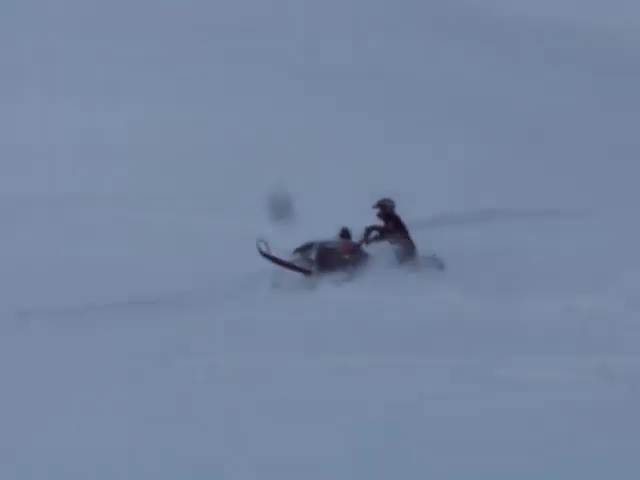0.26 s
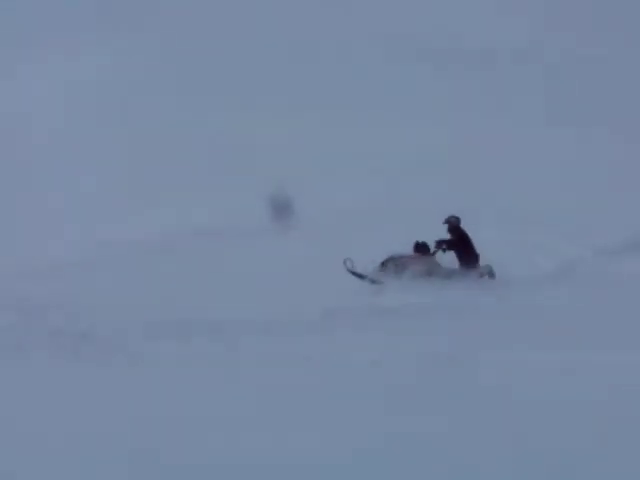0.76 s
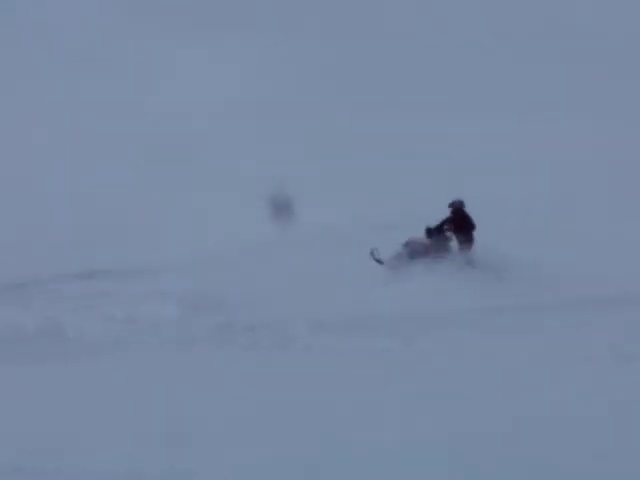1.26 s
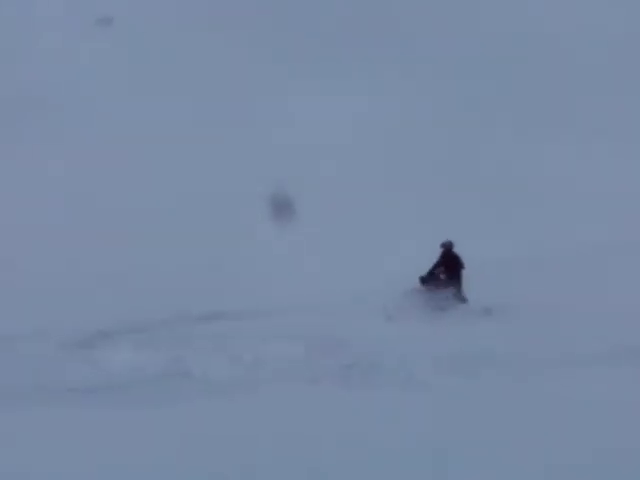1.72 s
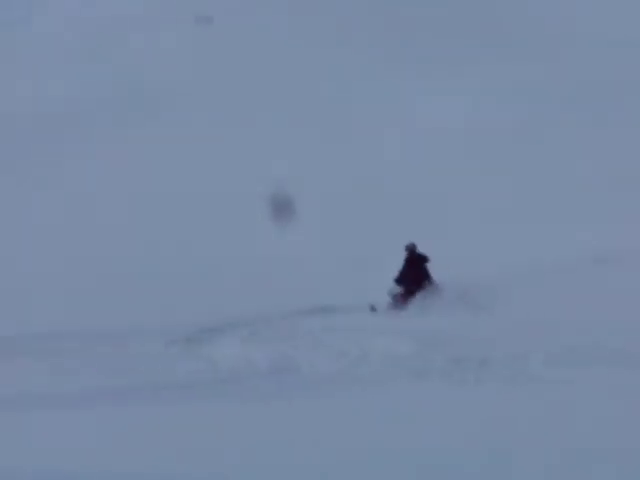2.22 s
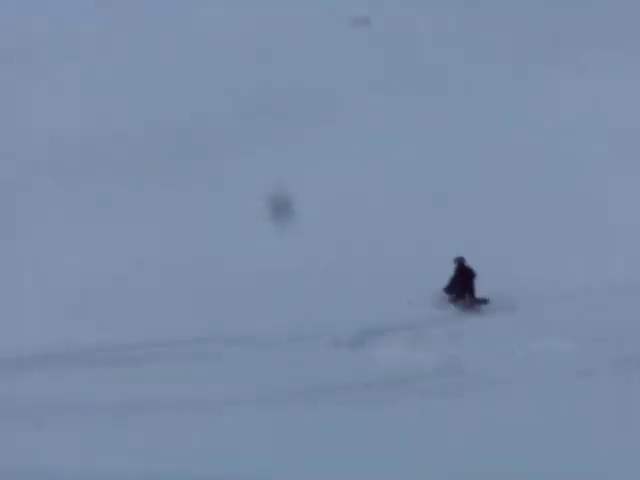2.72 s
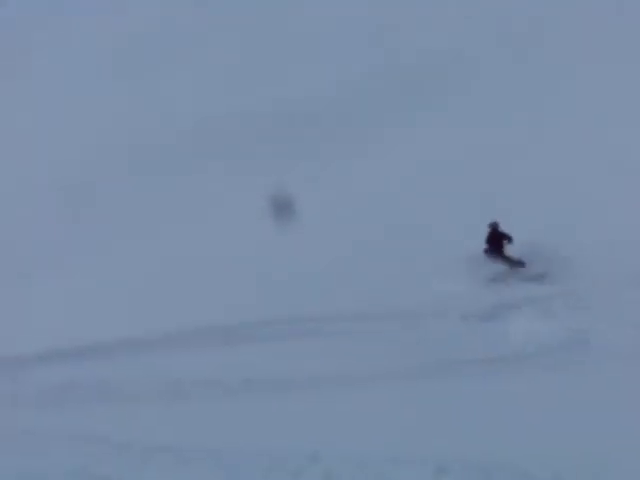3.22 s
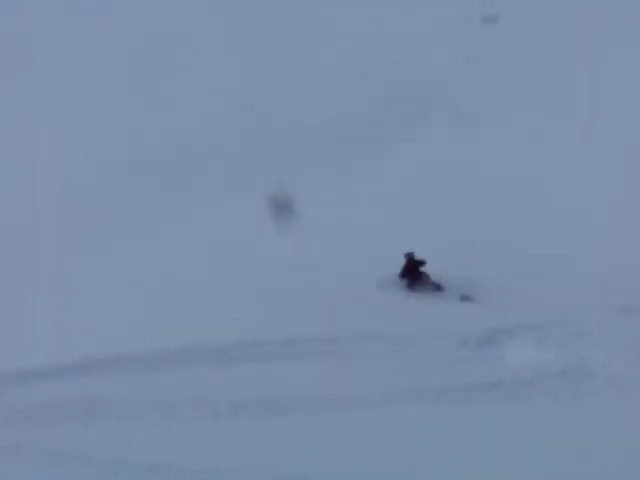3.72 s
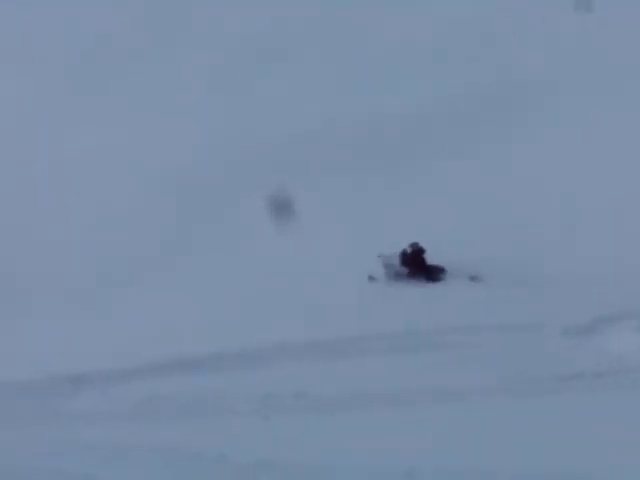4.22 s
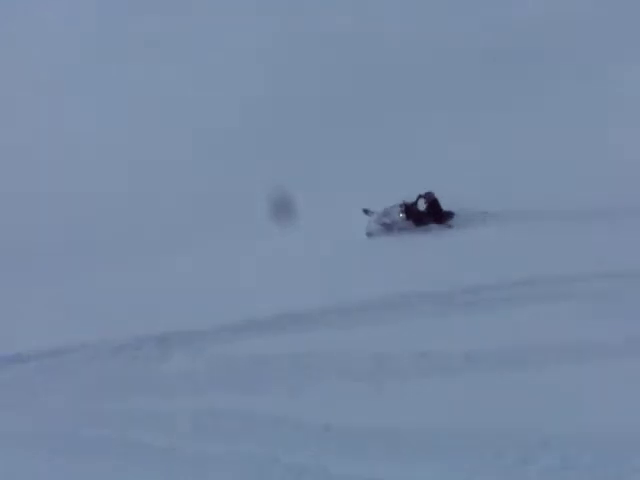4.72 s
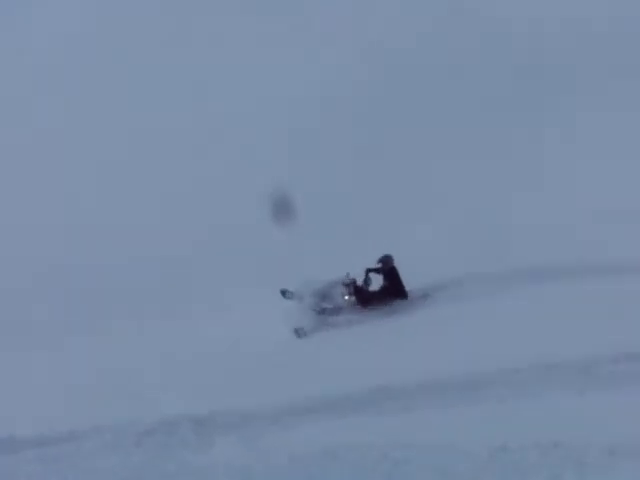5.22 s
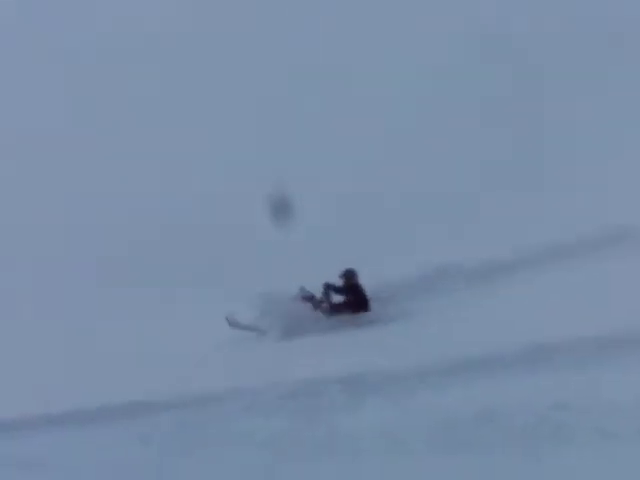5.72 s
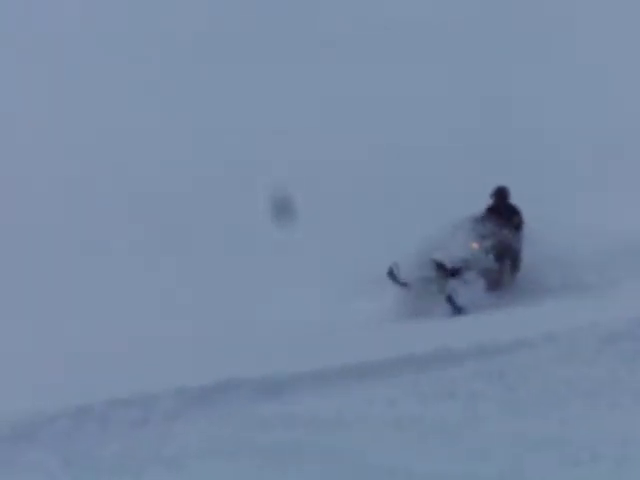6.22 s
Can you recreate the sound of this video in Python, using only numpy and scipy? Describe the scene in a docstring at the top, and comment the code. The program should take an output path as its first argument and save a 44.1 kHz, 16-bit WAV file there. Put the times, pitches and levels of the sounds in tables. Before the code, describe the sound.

On an open snowy slope, a two-stroke snowmobile some way off holds a loud, raspy scream for two seconds with a whining track. It cuts back, blips, nearly drops away, then roars up again, eases, climbs more softly and gives a last brief burst. Lumpy wind and small dull knocks touch the hand-held stereo microphone, stronger on the right.

```python
"""A two-cylinder two-stroke snowmobile is revved up and down in deep snow on an open slope, some way off.
The exhaust sings on multiples of the crank speed over a roar of noise that puffs with each firing.
The track adds a whine and its octave in three passages; the roar has a close echo from the snow.
Low lumpy wind noise and small ringing knocks reach a hand-held microphone pair, and its housing
colours the sled differently on each side."""
import sys
import numpy as np
from scipy import signal
from scipy.fft import rfft, irfft
from scipy.io import wavfile
from scipy.ndimage import map_coordinates

SR = 44100
rng = np.random.default_rng(int(sys.argv[2]) if len(sys.argv) > 2 else 0)


def boost_factor(decibels):
    """Convert a level in decibels to a linear amplitude factor."""
    exponent = np.asarray(decibels, float) / 20
    return 10 ** exponent


def materialize(psi):
    """Save the field psi as 16-bit PCM at rate SR to the path in sys.argv[1].

    A 1-D psi becomes a single channel; in a 2-D psi each row is a channel.
    """
    bounded = np.clip(np.atleast_2d(psi).T, -1, 1)
    quanta = np.round(bounded * 32767).astype(np.int16)
    wavfile.write(sys.argv[1], SR, quanta)


N = 284886


def rms_one(x):
    """Scale to rms 1."""
    return x / np.sqrt(np.mean(x ** 2) + 1e-20)


def in_time(rows):
    """Columns of a table, after its time column, at every sample."""
    s, *columns = np.transpose(rows)
    return [np.interp(np.arange(N) / SR, s, column) for column in columns]


def at_hz(points, hz):
    """Read a spectrum on a log frequency axis."""
    hz_points, values = np.transpose(points)
    return np.interp(np.log(hz + 1), np.log(hz_points + 1), values)


def drift(rate_hz):
    """Slow chance: random knots of spread 1, two per cycle of the rate, joined by cosine blends."""
    knots = rng.standard_normal(400)
    at = np.arange(N) / SR * rate_hz * 2
    k = at.astype(int)
    blend = 0.5 - 0.5 * np.cos(np.pi * (at - k))
    return knots[k] * (1 - blend) + knots[k + 1] * blend


def band(x, low_hz, high_hz, order=2):
    """Butterworth band-pass."""
    return signal.sosfilt(signal.butter(order, [low_hz, high_hz], "band", fs=SR, output="sos"), x)


def shaped(x, spectrum):
    """Colour a noise by a spectrum in dB."""
    hz = np.arange(N // 2 + 1) * SR / N
    return irfft(rfft(x) * boost_factor(at_hz(spectrum, hz)), N)


def exhaust(speed, roar_db, bright_db, tone_db, sixth_db):
    """Every crank multiple is a tone, most coloured by the pipe; each comes and goes as the sled turns."""
    # deep tones as the sled turns: start_s, firing_tone_db, lift_of_other_low_multiples_db
    deep_tones = [(0, -49.5, -1.5), (.58, -45.5, -0.5), (.7, -44.5, 0), (1.25, -54.5, -1.5), (1.7, -53, -3),
                  (2.0, -48.5, -1.5), (2.6, -49.5, -5.5), (2.76, -63, -1.5), (2.95, -51, 11),
                  (3.17, -61, 12.5), (3.38, -49, -6), (3.9, -49.5, -1.5), (4.43, -58.5, 7.5), (4.6, -52, 4),
                  (5.1, -53.5, -0.5), (5.4, -44, -2.5), (5.62, -41.5, 2), (5.82, -49.5, -2.5),
                  (6.35, -50, 1.5), (6.46, -62, 1.5)]
    # colour of the exhaust tones in the pipe: frequency_hz, level_db
    pipe_colour = [(330, -22), (430, -5.5), (520, -11), (630, -8.5), (760, 3.5), (900, -4.5), (1100, -2),
                   (1330, -3), (1700, -1.55), (1950, -4.5), (2330, -10), (2850, -6), (3300, -8),
                   (4200, -6.5), (5200, -18), (6000, -19), (7000, -21.5), (8000, -46)]
    # single tones that swell for a moment: middle_s, length_s, crank_multiple, swell_db
    swells = [(0.176, 0.34, 7, 5.5), (.4, 0.36, 10, 0), (.45, 0.79, 9, 2.5), (0.43, 0.36, 16, 6),
              (.52, 0.51, 19, 8), (.55, .5, 20, 8.5), (.54, 0.28, 23, 10), (0.605, 0.11, 8, 0.5),
              (0.903, 0.34, 23, 14), (.92, 0.28, 15, 11.5), (0.955, 0.51, 14, 5.5), (1.07, .7, 10, 7),
              (1.29, .45, 15, 12.5), (1.4, 0.44, 8, 3.5), (1.423, 0.57, 11, 7), (1.546, 0.99, 14, 9.5),
              (1.647, 1, 7, 12), (1.759, 0.23, 9, 1), (2.239, 0.17, 8, 13.5), (2.33, .2, 9, 13.5),
              (2.486, 0.26, 15, 8), (2.58, .2, 14, 8), (3.495, .2, 15, 2.5), (3.634, 0.15, 20, 13.5),
              (3.723, 0.41, 16, 9), (3.817, 0.18, 22, 13), (4.17, 0.16, 20, 16.5), (4.324, 0.73, 10, 8.5),
              (4.475, 0.37, 8, 6), (4.498, 0.65, 14, 9.5), (4.731, 0.28, 4, 10), (4.824, 0.23, 8, 10.5),
              (5.021, .55, 10, 15.5), (5.148, .25, 15, 10), (5.25, 0.57, 14, 6), (5.235, 0.3, 7, 11),
              (5.24, 0.22, 8, 6), (5.335, 0.2, 16, 10), (5.335, 0.15, 12, 9.5), (5.542, .3, 5, 7.5),
              (5.832, 0.14, 14, 7), (6.126, 0.66, 10, 8), (6.25, 0.33, 16, 8.5)]
    t = np.arange(N) / SR
    firing_db, low_lift_db = in_time(deep_tones)
    own_level_db = {1: roar_db - 31.5, 2: firing_db, 6: sixth_db}
    # firings do not come quite evenly, least so when coasting: high multiples blur
    coasting = np.clip((-40 - roar_db) / 4, 0, 1)
    jitter_turns = 0.0045 + 0.03 * coasting
    uneven_turns = np.cumsum(speed) / SR + jitter_turns * drift(25.0)
    # a geared shaft hums at 1.58 times the crank speed
    out = boost_factor(roar_db - 27 + 3.0 * drift(1.5)) * np.sin(2 * np.pi * 1.58 * uneven_turns)
    for k in range(1, 58):
        if k in own_level_db:
            level_db = own_level_db[k] + 1.43 * drift(12.0)
        else:
            low = np.clip((10 - k) / 3, 0, 1)
            level_db = tone_db + low * low_lift_db + at_hz(pipe_colour, k * speed)
            level_db -= 3 * (k % 2)  # odd multiples are weaker, as the two cylinders nearly match
            level_db += bright_db * np.clip((k - 20) / 15, 0, 1)  # high ones share the treble's swing
            waver_db = 2.8 * (1 + k / 40)
            level_db += waver_db * np.minimum(drift(4.0 + k / 8), 1.2)
        for middle_s, length_s, multiple, swell_db in swells:
            if round(multiple) == k:
                level_db += swell_db * np.cos(np.pi * np.clip((t - middle_s) / length_s, -0.5, 0.5))
        tone = np.sin(2 * np.pi * (k * uneven_turns + rng.random()))
        out += boost_factor(level_db) * np.sqrt(2) * tone
    return out


def roar(turns, roar_db, bright_db, rasp_db, body_db):
    """Intake, exhaust and thrown snow: noise that puffs twice a turn, one cylinder stronger."""
    # colour of the noise within the bands: frequency_hz, relative_level_db
    roar_colour = [(200, -36.5), (340, -16.5), (545, -17.5), (750, -13.5), (1200, -12.5), (1800, -2),
                   (2320, -7), (2850, -3.5), (3300, -8), (5200, -2.5), (5700, -10.5), (6700, -13),
                   (7500, -20.5), (8000, -31.5), (8600, -45)]
    puff, uneven_pair, patchy_db = 0.2, 0.12, 1.3
    beat = 1 + puff * np.cos(4 * np.pi * turns) + uneven_pair * np.cos(2 * np.pi * turns)
    white = rng.standard_normal((2, N)) * beat
    # low_hz, high_hz, level over the roar in dB
    parts = [(322, 564, body_db - 15.0), (640, 1364, body_db - 0.5), (1520, 2240, rasp_db - 0.5),
             (2335, 3980, -0.52), (4230, 8840, bright_db - 0.3)]
    out = 0
    for k, (low_hz, high_hz, over_db) in enumerate(parts):
        # neighbouring bands take turns on two separate noises
        noise = rms_one(band(shaped(white[k % 2], roar_colour), low_hz, high_hz, order=3))
        out = out + boost_factor(roar_db + over_db + patchy_db * drift(9.0)) * noise
    return out


def off_the_snow(x):
    """A close echo from the snow, its delay wandering as the sled rocks."""
    delay_s, wander_s, echo_db = 0.0022, 0.0004, -10
    late = np.arange(N) - SR * (delay_s + wander_s * drift(1.5))
    echo = boost_factor(echo_db) * map_coordinates(x, [late], order=3)
    return (x + echo) / np.sqrt(1 + boost_factor(2 * echo_db))


def wind():
    """Wind on the microphone: lumpy low noise, partly its own in each port, stronger on the right."""
    # strength ahead of the lumps and the side offsets: start_s, level_db
    wind_strength = [(0, -46), (.5, -51.5), (1.2, -55.5), (2.2, -57), (3.2, -55.5), (4.2, -56.5),
                     (4.55, -47.5), (5.3, -50), (5.5, -61.5), (5.87, -60), (5.97, -45.5), (6.1, -51.5),
                     (6.46, -48)]
    # colour of the wind noise: frequency_hz, relative_level_db
    wind_colour = [(15, 1.5), (30, -8), (65, 2.5), (120, -0.5), (200, 0.5), (260, 0.5), (400, -21),
                   (800, -60.5)]
    alike, lumpy_db = 0.78, 2.2  # alike: share of the power common to both ports
    mid, side = (rms_one(shaped(rng.standard_normal(N), wind_colour)) for _ in range(2))
    pair = np.sqrt(alike) * mid + np.sqrt(1 - alike) * side * [[1], [-1]]
    side_db = np.array([[-4.0], [2.5]])  # left, right
    return pair * boost_factor(in_time(wind_strength)[0] + lumpy_db * drift(7.6) + side_db)


def track():
    """Track lugs on the drive wheels: a whine and its octave while the track spins fast."""
    # one list for each passage: start_s, pitch_hz, whine_level_db
    passages = [
        [(.12, 1085, -46), (.22, 1045, -35), (.33, 1018, -33), (.45, 1025, -35), (.55, 1050, -39),
         (.64, 1085, -46)],
        [(1.2, 985, -46), (1.33, 1025, -40), (1.45, 1065, -40), (1.6, 1105, -37), (1.75, 1100, -34),
         (1.88, 1075, -37), (2.02, 1020, -36)],
        [(4.15, 1005, -48), (4.3, 1045, -43), (4.5, 1130, -44)],
    ]
    octave_db, fade_s = -3.0, 0.016
    t, out = np.arange(N) / SR, 0
    for rows in passages:
        s, pitch_hz, level_db = np.transpose(rows)
        fade = np.clip(np.minimum(t - s[0], s[-1] - t) / fade_s, 0, 1)
        phase = 2 * np.pi * np.cumsum(np.interp(t, s, pitch_hz)) / SR
        whine = np.sin(phase) + boost_factor(octave_db) * np.sin(2 * phase)
        out = out + fade * boost_factor(np.interp(t, s, level_db)) * np.sqrt(2) * whine
    return out


def knocks():
    """Each knock is a short dull click and a lower thud, both ringing briefly in the housing."""
    # knocks on the housing, levels ahead of the trims below: start_s, click_db, thud_db
    knock_list = [(0.253, -45, -37), (0.6, -36, -63), (1.347, -40, -67), (2.177, -39, -47),
                  (2.482, -37, -52), (3.388, -52, -74), (3.582, -41.5, -70), (4.295, -40, -69),
                  (4.449, -37, -67), (4.558, -53.5, -38), (5.087, -36, -66), (5.552, -40, -42.5),
                  (5.78, -40.5, -62), (5.947, -34.5, -57), (5.987, -44.5, -39.5), (6.412, -39, -43)]
    decay_s = 0.005
    out, t = np.zeros((2, N)), np.arange(3000) / SR
    click = np.exp(-t / decay_s) * (np.sin(2 * np.pi * 360 * t) + np.sin(2 * np.pi * 540 * t))
    thud = np.exp(-t / (2 * decay_s)) * np.sin(2 * np.pi * 115 * t)
    side_gain = boost_factor(np.array([[-2.5], [2.5]]))  # stronger on the right
    for start_s, click_db, thud_db in knock_list:
        burst = boost_factor(click_db + 1.5) * click + boost_factor(thud_db + 4.5) * thud
        i = round(start_s * SR)
        out[:, i:i + len(t)] += (burst * side_gain)[:, :N - i]
    return out


def housing(x):
    """The two ports hear the sled through their own shading; the slope scatters a little back."""
    # shading between the ports: frequency_hz, left_minus_right_db
    shade = [(60, -4.5), (71, -3.5), (84, -3.5), (99, -3.0), (120, -3.0), (140, -3.0), (160, -2.0),
             (200, -2.0), (230, -2.0), (270, -2.0), (320, -1.5), (380, -2.0), (450, -4.0), (540, -5.0),
             (640, -3.0), (750, -2.5), (890, -2.0), (1050, -8.5), (1250, -7.5), (1480, -6.0), (1750, -6.5),
             (2070, -5.5), (2450, 4.5), (2900, 3.5), (3430, -3.0), (4060, -11.5), (4810, -11.0),
             (5690, -9.5), (6730, -6.0), (7970, -1.5)]
    # phase between the ports: frequency_hz, left_leads_by_rad
    phase_lead = [(0, 0), (430, -0.3), (780, -0.0), (1030, -0.8), (1290, 0.7), (1550, 0.2), (1980, 0.7),
                  (2240, 1.4), (2760, -0.2), (3530, -1.0), (3790, -0.8), (4220, 0.2), (4740, 0.2),
                  (5080, 0.8), (5430, 0.8), (5680, 1.3), (6120, 1.0), (6980, 1.5), (7490, 1.3), (7920, 0.1),
                  (8180, -0.1)]
    scatter_db, scatter_decay_s = -16, 0.0048
    hz = np.arange(N // 2 + 1) * SR / N
    # each port takes half of the difference
    tilt, lead = boost_factor(at_hz(shade, hz) / 2), np.exp(0.5j * at_hz(phase_lead, hz))
    left, right = tilt * lead, 1 / (tilt * lead)
    mid = np.abs(left + right) / 2  # keeps the spectrum of the mono sum
    pair = np.array([irfft(rfft(x) * side / mid, N) for side in (left, right)])
    tail = rng.standard_normal((2, 6000)) * np.exp(-np.arange(6000) / (scatter_decay_s * SR))
    tail /= np.sqrt(np.sum(tail ** 2, axis=1, keepdims=True))
    return pair + boost_factor(scatter_db) * signal.fftconvolve(pair, tail, axes=1)[:, :N]


def scene():
    """Engine, track, wind and knocks; roar and wind together dip in a narrow low band."""
    # crank speed: start_s, turns_per_s
    crank_speed = [(0.0, 123.9), (0.16, 123.9), (0.31, 121.5), (0.57, 123.7), (0.66, 125.9), (0.71, 125.2),
                   (0.86, 120.3), (1.01, 118.9), (1.39, 123.7), (1.51, 124.4), (1.65, 123.9), (1.99, 119.4),
                   (2.13, 92.0), (2.19, 87.4), (2.22, 88.9), (2.43, 111.1), (2.54, 119.3), (2.62, 122.8),
                   (2.71, 107.8), (2.9, 83.0), (2.95, 81.5), (3.07, 84.2), (3.2, 77.0), (3.27, 82.3),
                   (3.43, 105.7), (3.55, 119.1), (3.62, 124.2), (3.72, 129.1), (3.85, 127.8), (4.01, 123.7),
                   (4.12, 122.2), (4.39, 125.6), (4.59, 128.8), (4.7, 107.2), (4.755, 100.2), (4.94, 112.0),
                   (5.29, 128.0), (5.45, 132.8), (5.59, 135.1), (5.7, 134.7), (5.8, 132.2), (6.04, 120.4),
                   (6.11, 119.4), (6.17, 121.0), (6.355, 131.8), (6.44, 120.0), (6.46, 119.0)]
    # the engine as heard: start_s, roar_db, treble_over_roar_db, exhaust_tones_db, sixth_multiple_db
    engine = [(0.0, -27, 0.5, -32, -28.5), (0.2, -25.5, -0.5, -32.5, -29.5), (0.45, -27, -2, -29.0, -34.5),
              (0.65, -23.5, -1, -30.5, -22), (0.88, -27.5, 3, -31.5, -32), (1.2, -25.5, -2.5, -31.5, -35.5),
              (1.45, -27, -1.5, -30, -37.5), (1.75, -25.5, -2, -31.0, -39.5), (2.0, -28.5, 2, -33.5, -30.5),
              (2.05, -28.5, -1.5, -53.5, -70), (2.16, -38, -1, -45, -45), (2.28, -32, -7, -41.5, -45.5),
              (2.5, -30, 1, -34, -37.5), (2.64, -29.5, -0.5, -40, -34.5), (2.72, -36, -1, -49, -67),
              (2.88, -46, -9, -57.5, -61), (3.2, -44, -5, -63.5, -61), (3.36, -42, -2.5, -38, -48.5),
              (3.55, -26, -4.5, -39, -35.5), (3.65, -28, -4.5, -37.5, -23.5), (3.9, -37.5, -1, -38, -23.5),
              (4.1, -31, -2.5, -37.5, -31.5), (4.43, -27.5, -4, -33.5, -17.5), (4.6, -28, -9.5, -35, -23.5),
              (4.64, -27.5, -5.5, -44.5, -50), (4.75, -34.5, -7, -47, -44), (4.85, -37, -3.5, -42, -43),
              (5.05, -34.5, -5.0, -39.0, -31.0), (5.27, -31.5, -6.5, -37, -24),
              (5.4, -31.0, -4.5, -36, -35), (5.6, -32.0, -3.5, -39, -37.5),
              (5.8, -34.0, -4.5, -39.5, -37.5), (6.0, -39.5, -5, -42.5, -44), (6.2, -35, -3.5, -41, -41.5),
              (6.35, -28, -2.0, -36.5, -28.0), (6.4, -32, -1, -45.5, -33.5), (6.46, -34, -0.5, -47, -59)]
    # colour of the roar as the sled turns: start_s, rasp_over_roar_db, body_over_roar_db
    turning_colour = [(0, -2, -5.5), (.55, -3.5, -8.5), (1.2, 0.5, -5), (1.9, -2, -6), (2.2, -6.5, -1),
                      (2.5, -5, -5.5), (3.0, 1, 1), (3.4, 4, 0), (3.62, -12.5, -9), (3.9, -1, 0),
                      (4.5, -5, -3.5), (4.65, -2.5, -7), (4.85, 6, 2), (5.15, 1, -1.5), (5.5, -5, -2),
                      (6.1, -4, -4.5), (6.46, -3, -8)]
    speed = in_time(crank_speed)[0]
    roar_db, bright_db, tone_db, sixth_db = in_time(engine)
    rasp_db, body_db = in_time(turning_colour)
    tones = housing(exhaust(speed, roar_db, bright_db, tone_db, sixth_db) + track())
    puffing = roar(np.cumsum(speed) / SR, roar_db, bright_db, rasp_db, body_db)
    floor = housing(off_the_snow(puffing)) + wind()
    notch_hz, notch_width_hz = 305, 80
    notch = signal.iirnotch(notch_hz, notch_hz / notch_width_hz, fs=SR)
    return tones + signal.lfilter(*notch, floor) + knocks()


def roll_off(x):
    """The treble ends steeply here."""
    return signal.sosfilt(signal.butter(12, 8570, fs=SR, output="sos"), x)


def record(dry):
    """The microphone pair's sound ends at a steep top edge, 60 dB down from 10534 Hz upward."""
    cut = signal.sosfilt(signal.cheby2(10, 60, 10534, fs=SR, output="sos"), dry)
    return roll_off(cut)


dry = scene()
out = record(dry)
materialize(out)
```